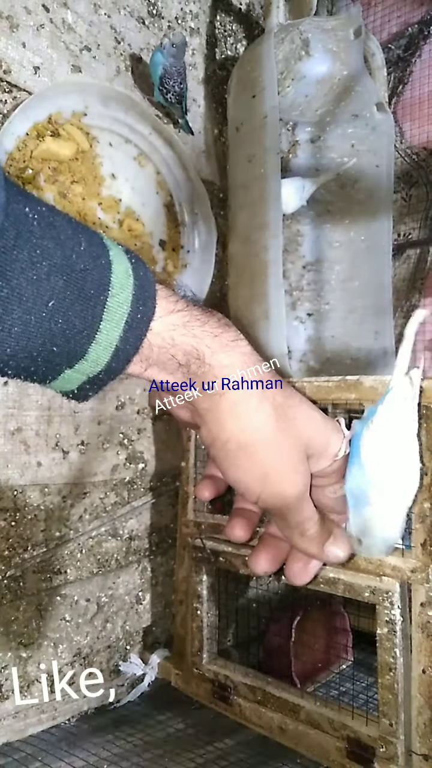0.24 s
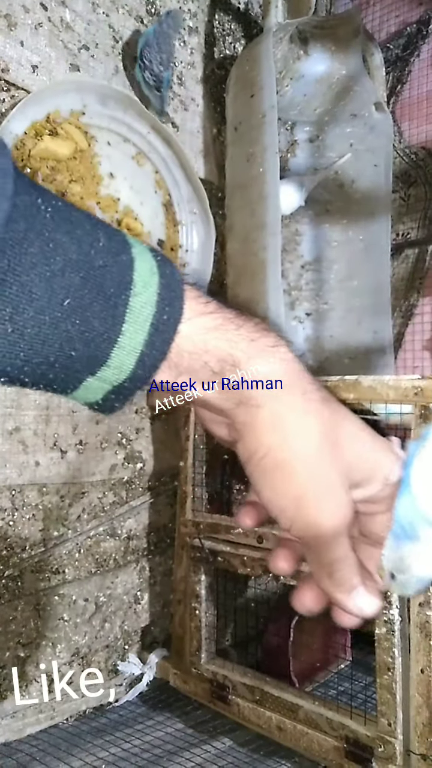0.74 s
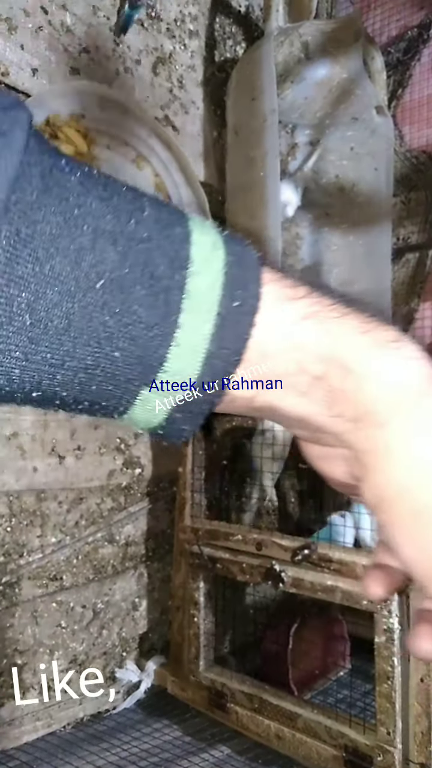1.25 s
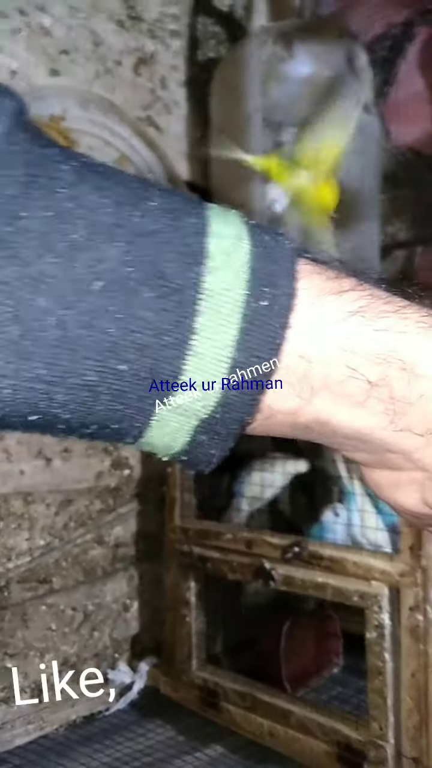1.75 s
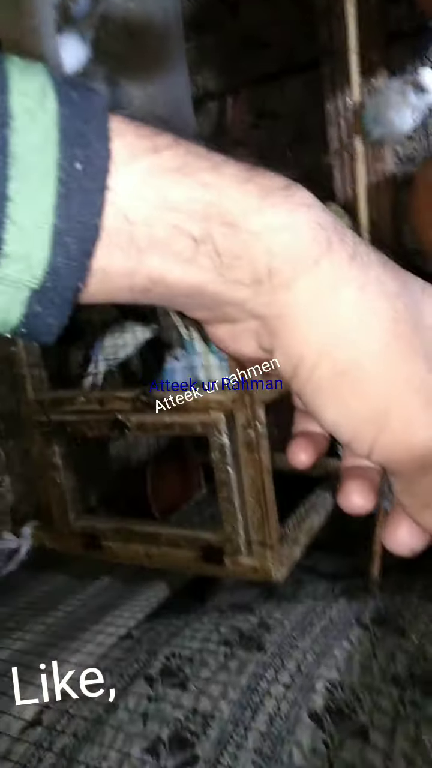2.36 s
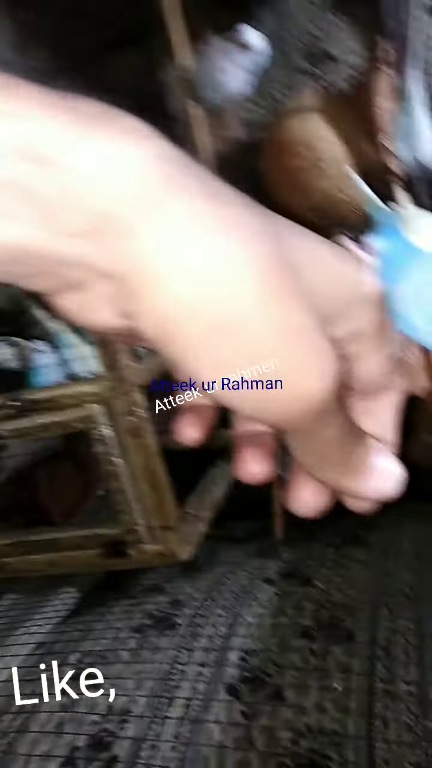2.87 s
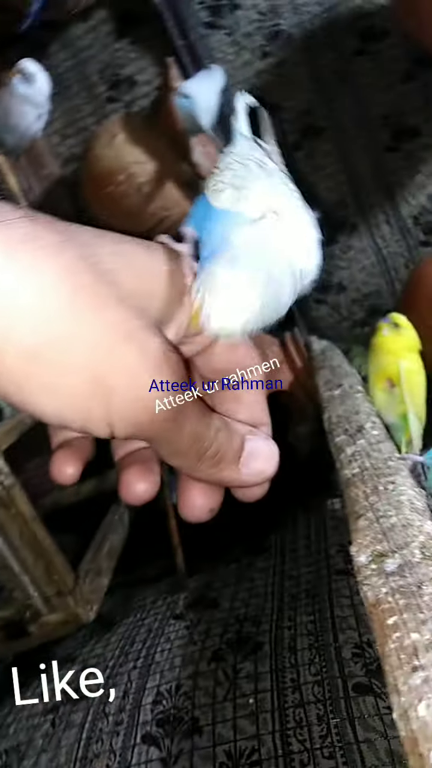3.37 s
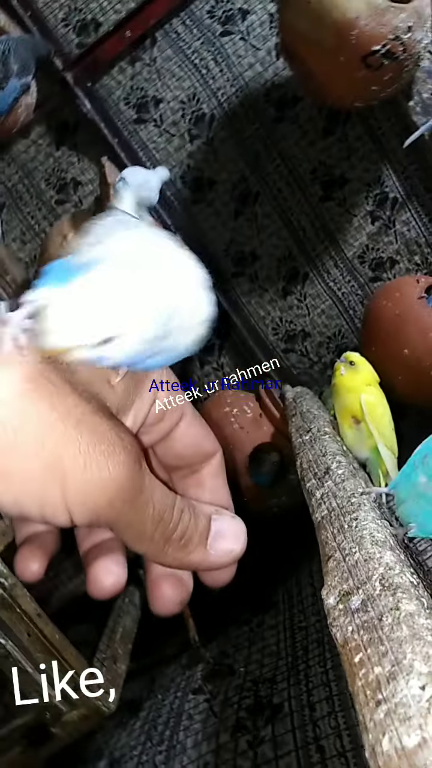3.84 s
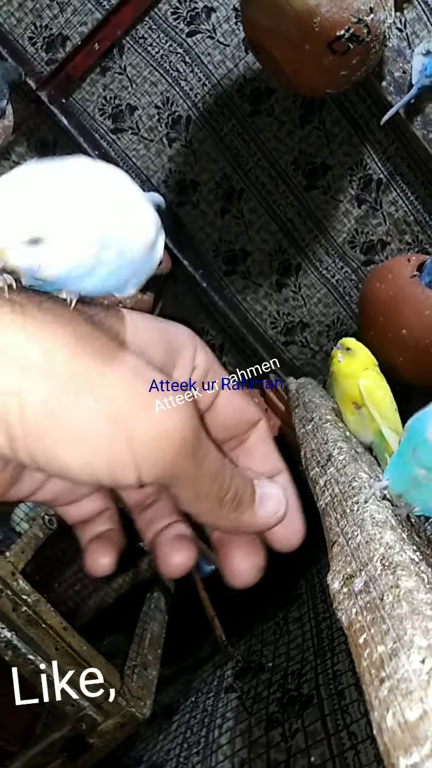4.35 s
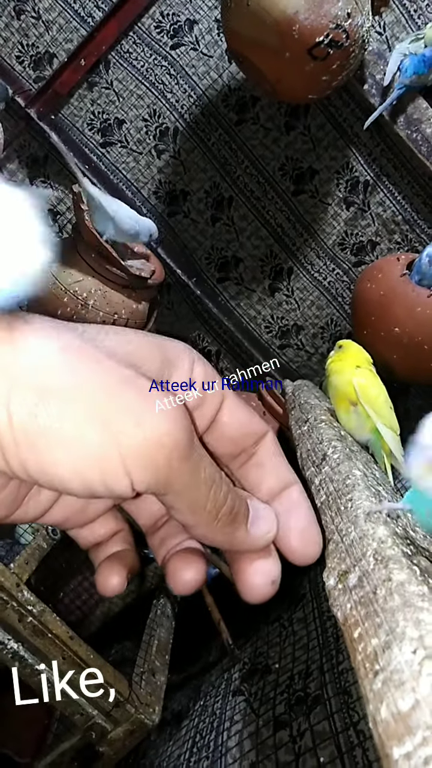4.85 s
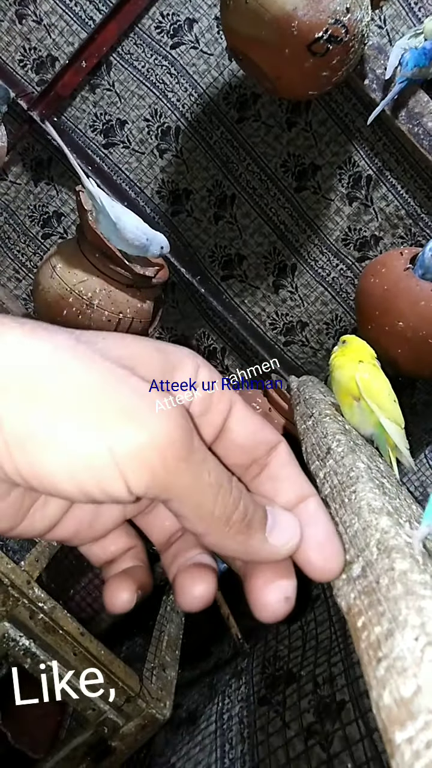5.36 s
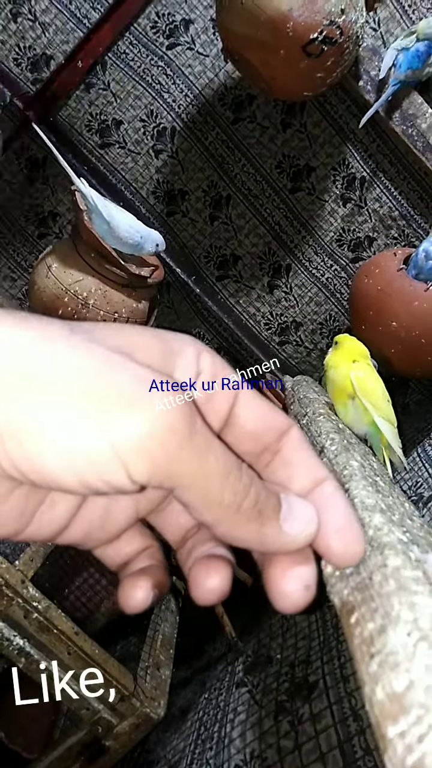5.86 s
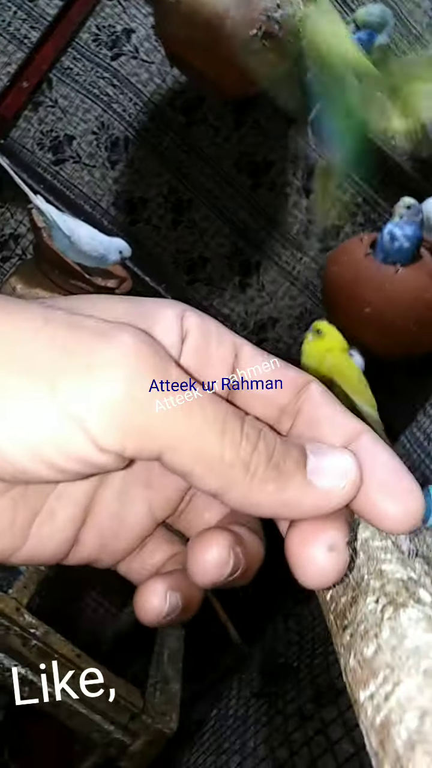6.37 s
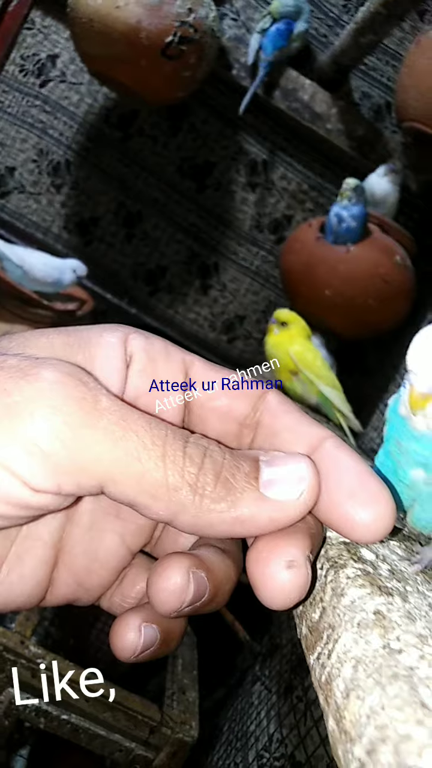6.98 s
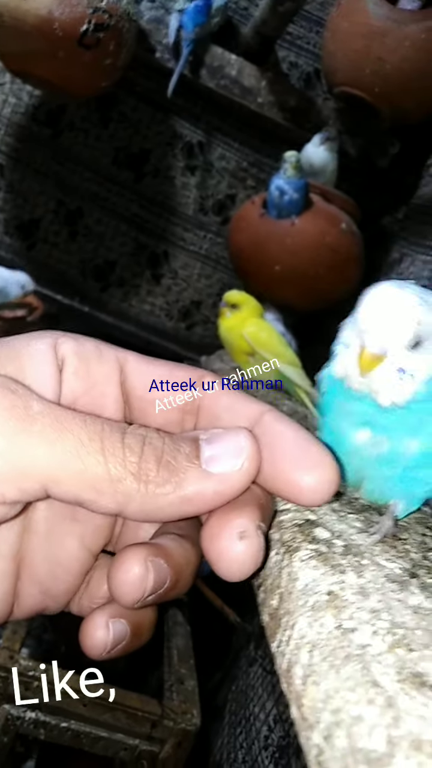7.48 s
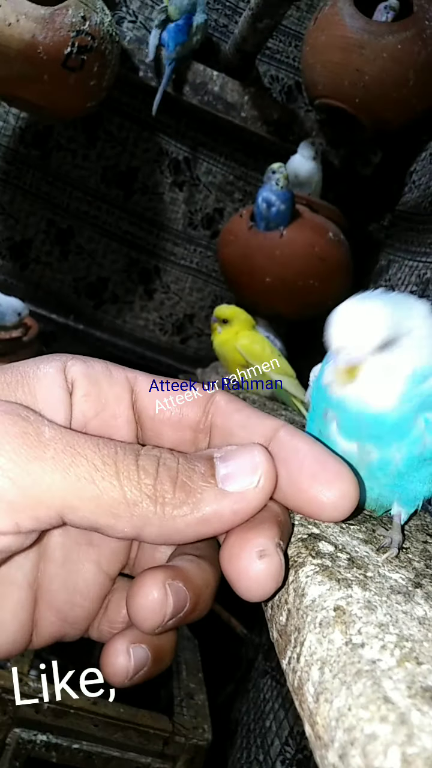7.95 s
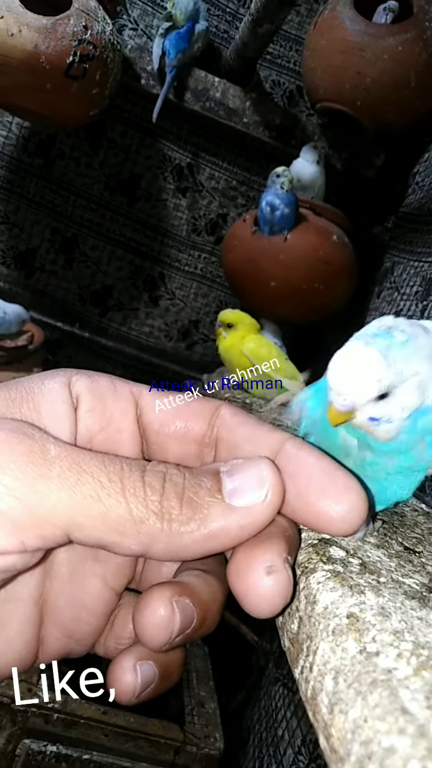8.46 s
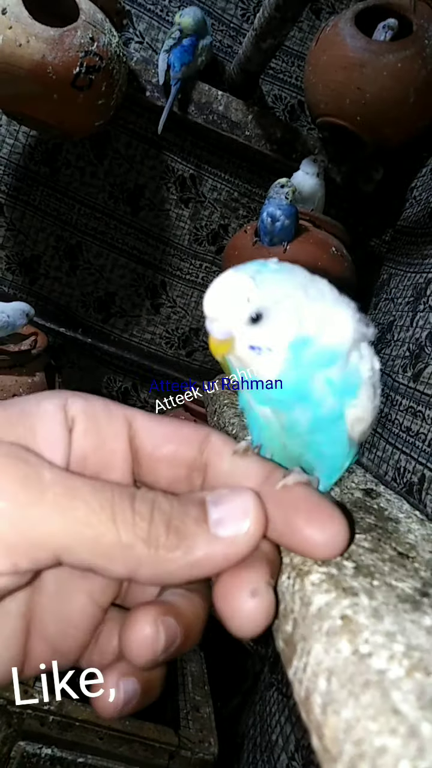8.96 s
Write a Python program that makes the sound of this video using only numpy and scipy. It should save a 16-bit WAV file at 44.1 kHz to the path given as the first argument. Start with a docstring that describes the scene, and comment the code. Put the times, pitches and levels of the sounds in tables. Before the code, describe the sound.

A flock of budgerigars chatters in a small enclosed aviary, captured close by a hand-held phone with weak echoes and a short tail. From 0 to 2.5 s, rapid rasping squawks, each a buzz of tiny puffs, mix with brief whistles over distant twitter; a claw tick snaps at the start. Around 2.6 s come harder squawks, a dull handling bump and a piercing high whistle, then a sharp double tick at 2.8 s. From 3.5 to 4.4 s, clear gliding whistles lead, strongest near 3.7 s. From 4.5 to 6.3 s it thins to sparse soft squawks, faint nasal warbles, low muttering and a tick at 5.6 s. Squawks return at 6.4 s, with bright whistles near 7 s. From 7.3 to 9 s, dense harsh scolding and very high chirps dominate, ending at 9.2 s on thin chirps. Low rumble and skin rubbing come and go underneath.

```python
"""A flock of budgerigars chatters in a small aviary: rasping squawks made of rapid puffs of air and a beak chirp,
whistles that are single gliding tones, and soft nasal warbles built from stacked harmonics.
Beaks and claws tick on perches as short ringing bursts of noise, and birds further off twitter as many
overlapping glides over a wash of noise. The hand-held phone adds shaped noise for rumble and rubbing, and one bump.
Weak echoes and a short tail give the sound of the aviary."""
import sys
import numpy as np
from scipy import signal
from scipy.fft import rfft, irfft, next_fast_len
from scipy.io import wavfile
from scipy.ndimage import uniform_filter1d, minimum_filter1d, map_coordinates

SR = 44100
rng = np.random.default_rng(int(sys.argv[2]) if len(sys.argv) > 2 else 0)


def waveform_to_disk(signal):
    """Save audio, clipped to [-1, 1], as 16-bit WAV at the path in sys.argv[1]."""
    frames = np.transpose(np.atleast_2d(signal))
    scaled = np.clip(frames, -1, 1) * 32767
    samples = np.round(scaled).astype(np.int16)
    wavfile.write(sys.argv[1], SR, samples)


N = 406602  # samples in the scene

# Rasping squawks. Each row: start in seconds, length in seconds, middle throat level in dB,
# beak level in dB, low throat level in dB.
SQUAWK_CALLS = [(0, 0.082, -25, -22.5, -45), (0.084, 0.054, -26, -23.5, -52),
                (0.223, 0.05, -21.5, -20.5, -37), (0.263, 0.11, -29.5, -31.5, -48),
                (0.42, 0.036, -34, -39, -35.5), (0.596, 0.047, -28, -34, -38),
                (0.857, 0.023, -30.5, -37, -55), (0.971, 0.058, -30, -39.5, -41.5),
                (1.118, 0.035, -33.5, -61, -35.5), (1.2, 0.035, -30.5, -27, -42.5),
                (1.247, 0.09, -30, -36.5, -45), (1.377, 0.11, -29.5, -34, -42.5),
                (1.602, 0.037, -31.5, -24, -37.5), (1.685, 0.055, -27, -32, -59),
                (1.728, 0.09, -23.5, -24, -45), (1.829, 0.029, -32, -24, -49),
                (1.878, 0.059, -27, -23.5, -44), (1.935, 0.048, -30, -28.5, -48),
                (2.017, 0.032, -35.5, -59, -47), (2.089, 0.03, -30, -31, -64),
                (2.238, 0.11, -24, -26.5, -58), (2.547, .054, -22, -17.5, -35),
                (2.682, 0.043, -21.5, -28, -47), (3.297, .024, -30, -29.5, -38),
                (3.612, 0.034, -27, -33, -26.5), (3.713, 0.03, -29.5, -38, -34),
                (4.131, 0.033, -35.5, -50, -42), (4.303, 0.058, -30.5, -38.5, -43.5),
                (4.58, .069, -32, -36.5, -41), (4.675, 0.026, -35, -38.5, -58),
                (4.889, 0.048, -43, -61, -38), (5.054, 0.09, -39.5, -47, -39.5),
                (5.268, 0.045, -37.5, -48, -45), (5.748, 0.15, -33, -39.5, -62),
                (6.101, 0.024, -35, -28.5, -40), (6.16, 0.066, -31, -37, -38), (6.379, 0.09, -25, -19, -50),
                (6.467, 0.083, -23.5, -25, -49), (6.529, 0.059, -38, -37, -47.5),
                (6.935, 0.084, -26.5, -28.5, -56), (7.362, 0.11, -20.5, -20, -60),
                (7.492, 0.083, -25.5, -20.5, -64), (7.605, 0.057, -24, -18, -41),
                (7.668, 0.08, -37, -31, -43), (7.731, 0.072, -21.5, -16.5, -39.5),
                (8.06, 0.078, -25, -15.5, -45), (8.205, 0.12, -27, -19, -53), (8.345, .11, -29, -21, -43),
                (8.501, 0.12, -27, -19, -68), (8.683, 0.11, -22.5, -14.5, -35), (8.848, .1, -20, -17, -32),
                (8.944, 0.072, -23, -18.5, -35)]
# Whistled notes. Each row: start in seconds, length in seconds, pitch halfway through in Hz,
# slide from start to end in octaves, level in dB.
WHISTLE_NOTES = [(0.14, 0.052, 2650, -0.61, -37), (0.712, .05, 3440, 0.012, -33.5),
                 (0.991, 0.084, 3490, -0.081, -33), (1.072, 0.043, 2250, .3, -41.5),
                 (1.688, 0.035, 3470, -0.16, -21.5), (2.127, 0.062, 3234, 0.15, -27.5),
                 (2.201, 0.015, 3600, -0.36, -29), (2.214, .045, 2670, .5, -30.5),
                 (2.476, 0.023, 3320, -.15, -29.5), (2.596, 0.044, 2680, -0.0027, -29.5),
                 (2.701, 0.039, 4616, 0.12, -10.5), (2.729, 0.041, 4450, -0.025, -29),
                 (2.793, 0.045, 2410, -1.15, -31.5), (2.877, 0.046, 2390, 0.39, -31),
                 (3.246, 0.059, 2515, 0.35, -32), (3.339, 0.075, 2770, 0.23, -39.5),
                 (3.473, 0.06, 3900, -0.025, -35.5), (3.473, 0.056, 5740, 0.0015, -45),
                 (3.57, 0.03, 2620, 0.0043, -23.5), (3.59, .031, 3810, -0.23, -22),
                 (3.632, .049, 2985, 0.2, -14.5), (3.677, .04, 2866, -.1, -11),
                 (3.711, .018, 2810, .03, -21), (3.746, .012, 3120, -.6, -17.5),
                 (3.939, .022, 2645, -0.082, -28.5), (3.954, .033, 2800, -.25, -29.5),
                 (4.008, 0.073, 2705, 0, -29.5), (4.035, 0.052, 3800, 0.45, -37.5),
                 (4.044, .07, 8300, .42, -43), (4.087, 0.044, 2680, -0.82, -34.5),
                 (4.24, .019, 3910, 0.41, -30.5), (4.256, 0.014, 2670, -0.33, -21),
                 (4.263, 0.039, 4420, -.55, -31), (4.274, 0.043, 3920, .1, -30),
                 (4.324, .03, 2777, -0.21, -26), (4.348, 0.043, 1297, -0.84, -46),
                 (4.385, 0.086, 2910, 0.073, -33), (5.286, 0.07, 2850, 0.3, -34),
                 (5.366, .054, 2410, 0.18, -35), (5.418, 0.0296, 2560, .1, -29.5),
                 (5.452, 0.052, 2410, -0.82, -37.5), (5.746, .028, 3450, 0.028, -28.5),
                 (5.749, 0.0678, 2610, 0.24, -30), (5.844, 0.0273, 3580, 0.017, -27),
                 (6.88, 0.018, 2860, -0.15, -14.5), (6.899, 0.017, 3900, 0.26, -22),
                 (6.916, 0.021, 3380, -.35, -18), (6.938, 0.02, 1900, 1.24, -25),
                 (6.963, 0.047, 2870, 0.0058, -13.5), (7.02, .012, 2965, 0.23, -10.5),
                 (7.028, .021, 2420, -1.86, -24), (7.155, 0.061, 2500, 0.72, -34),
                 (7.211, 0.017, 5100, 0.024, -30.5), (7.241, 0.047, 2433, -0.021, -27.5),
                 (7.267, .048, 5250, .38, -25), (7.309, .052, 2740, 0.028, -23.5),
                 (7.354, 0.0186, 5450, 0.24, -20), (7.53, 0.029, 5400, 0, -21),
                 (7.623, .032, 6350, -0.32, -14.5), (7.66, .025, 6130, -0.4, -23),
                 (7.689, 0.026, 4550, 0.55, -22.5), (7.71, .051, 6200, 0.025, -21.5),
                 (7.877, 0.034, 3090, -.4, -29), (7.923, 0.046, 3250, -1.18, -28),
                 (8.042, 0.018, 2410, -0.4, -36), (8.159, .014, 6900, 0.13, -21),
                 (8.177, .022, 6650, -.2, -23), (8.316, 0.0385, 2660, .22, -32),
                 (8.461, 0.034, 6260, .1, -27.5), (8.59, .024, 3900, -.14, -21),
                 (8.644, 0.072, 2820, -0.3, -28.5), (8.828, .029, 3550, -0.37, -17.5),
                 (8.879, 0.043, 2940, -.15, -21.5), (9.075, 0.045, 6450, -0.082, -20.5),
                 (9.128, .028, 6480, -0.21, -26), (9.183, 0.035, 6320, -0.048, -20.5)]
# Nasal warbles. Each row: start in seconds, length in seconds, pitch halfway through in Hz,
# slide from start to end in octaves, level in dB.
WARBLE_NOTES = [(1.536, 0.059, 603, -0.257, -35), (3.467, 0.092, 657, -.1, -44),
                (3.54, 0.05, 660, 0.17, -40), (4.75, 0.12, 537, -0.14, -50.5),
                (5.128, 0.086, 494, -.18, -44.5), (7.965, .068, 447, -0.23, -37.5)]
# Beak and claw ticks. Each row: time in seconds, peak level in dB, resonance in Hz.
PERCH_TICKS = [(0.088, -11.5, 5300), (0.405, -19.5, 4030), (0.7256, -18.5, 3400), (2.8258, -9, 4830),
               (2.8308, -10, 5700), (3.1285, -21, 3270), (3.4544, -24.5, 2610), (4.834, -31, 4260),
               (5.046, -26.5, 2670), (5.5581, -14.5, 3530), (6.0466, -22, 2460), (6.305, -30, 7980)]
# How strong the distant chatter is, before its two parts are balanced. Each row: time in seconds, level in dB.
CHATTER_LEVEL = [(0.0, -22.5), (0.13, -36), (0.36, -45), (1.03, -39), (1.21, -34.5), (2.11, -39.5),
                 (2.28, -54), (2.54, -36), (2.67, -39), (3.08, -41), (3.52, -41.5), (4.03, -40),
                 (4.19, -42.5), (5.11, -45), (5.24, -46), (6.83, -42.5), (7.04, -38), (7.5, -27.5),
                 (8.06, -33.5), (8.81, -29), (9.07, -34), (9.22, -36)]
# How strong the low muttering is, before its own trim. Each row: time in seconds, level in dB.
MUTTER_LEVEL = [(0.0, -54), (1.23, -49.5), (1.64, -46.5), (2.13, -51), (3.62, -44), (4.21, -56.5),
                (4.72, -40), (5.65, -53.5), (6.32, -43.5), (6.73, -54.5), (7.32, -48), (9.22, -57.5)]
# Tone colours of the throat, beak, nose and distant birds.
# Each row: frequency in Hz, relative level in dB.
LOW_THROAT_COLOUR = [(200, -74), (700, -8.5), (1150, -5.5), (1500, 6), (2000, 10.5), (2600, 3.5),
                     (5000, -58)]
MID_THROAT_COLOUR = [(1200, -68), (2100, -8), (2900, -0.5), (3600, 4.5), (4600, 0), (5600, -12),
                     (9000, -61)]
BEAK_COLOUR = [(3200, -35), (4700, -1.5), (5600, 1.5), (6400, -1), (7200, -3), (8200, -10), (9700, -15.5),
               (11000, -25), (14500, -28)]
NASAL_COLOUR = [(500, -29), (1000, -10), (1600, 4), (2200, -4), (3100, 2.5), (4100, -6.5), (5500, -17),
                (8000, -22), (12000, -41)]
FAR_COLOUR = [(300, -49), (550, -28), (800, -6.5), (1400, -6.5), (2700, 11.5), (4500, 2), (6500, 1),
              (9000, -3.5), (14500, -29.5)]
# Tone colours of the booming phone case and of skin rubbing on it.
# Each row: frequency in Hz, relative level in dB.
RUMBLE_COLOUR = [(30, -14), (50, -5), (60, -13), (71, 6.5), (82, -4), (105, -3.5), (125, 3.5), (140, -8),
                 (172, -15), (196, -0.5), (220, -20), (280, -14.5), (420, -52)]
RUBBING_COLOUR = [(120, -12), (200, -1), (300, -2), (500, -2), (800, -5.5), (1500, -17), (4000, -23)]
# How strong the case rumble is, then the rubbing. Each row: time in seconds, level in dB.
RUMBLE_LEVEL = [(0.0, -46), (0.25, -63), (0.36, -40), (0.95, -42.5), (1.1, -62), (1.28, -44.5),
                (1.98, -42.5), (2.15, -50), (2.39, -39.5), (3.62, -46.5), (4.24, -86), (4.41, -65),
                (5.52, -44.5), (6.52, -38), (7.8, -54.5), (7.83, -72), (9.12, -42), (9.22, -59)]
RUBBING_LEVEL = [(0.0, -49.5), (0.25, -62), (0.38, -44), (0.74, -50), (1.08, -67), (1.85, -47), (3.57, -51),
                 (4.96, -87.5), (5.6, -49), (5.88, -55.5), (6.57, -43), (6.8, -56.5), (6.91, -42.5),
                 (7.37, -56.5), (7.58, -46), (7.91, -71.5), (8.42, -57), (9.22, -49)]
# How long the aviary rings. Each row: frequency in Hz, time to fade by 60 dB in seconds.
AVIARY_FADE = [(200, 0.55), (2500, 0.24), (6000, 0.35), (14000, 0.064)]

# The harder a squawk rings at the beak, the deeper its pulses (levels in dB, depth 0 to 1).
HARD_DB, HARD_DEPTH, DEPTH_PER_DB, SOFT_DEPTH = -16.5, 0.89, 0.23, 0.39
SQUAWK_EDGE_S = 0.0049  # rise and fall of the hardest squawks, in seconds
SQUAWK_PEAK, WHISTLE_PEAK = 0.39, 0.5  # loudest moment, as a share of the note's length
# Level and rising notes start and end this many octaves under their straight slide.
ARCH_OCTAVES = 0.1182
# Falling notes arch less; steep ones bend the other way: they drop fast, then level off.
DIVE_BEND, DIVE_LIMIT_OCTAVES = 0.341, 0.093
# A whistle swells as it slides through this throat resonance: centre, width, boost.
THROAT_HZ, THROAT_OCTAVES, THROAT_DB = 3050, 0.49, 5.5
TOP_HZ = 14350  # nothing is kept from here up


def squawks(pulse_hz=180, jitter=0.14, beak_hz=6000, arch_hz=850, sag_db=22):
    """The syrinx opens in rapid puffs: each rasps in the throat and makes a tiny arched chirp at the beak."""
    breathy, ringing = np.zeros(N), np.zeros(N)
    for start, length, mid_db, beak_db, low_db in SQUAWK_CALLS:
        u = progress(length)
        n = len(u)
        depth = np.clip(HARD_DEPTH + DEPTH_PER_DB * (beak_db - HARD_DB), SOFT_DEPTH, 1)
        rate = pulse_hz * (1 + 0.041 * rng.standard_normal() + jitter * wobble(n, 161.6))
        opening = (1 - np.cos(phase_of(rate) + 1)) / 2
        puffs = np.exp(1.8 * depth * opening) * amp(1.9 * wobble(n, 170))
        # deeply pulsed calls start and stop abruptly, the others ease in and out
        edge = SQUAWK_EDGE_S + 0.23 * length * (1 - depth) ** 2
        drive = puffs * swell(u, SQUAWK_PEAK, edge, sag_db)

        # quiet calls are more voiced than the hard scolding
        voiced = np.clip(0.25 - (mid_db + 20) / 45, 0.2, 0.65)
        low = throat(drive, LOW_THROAT_COLOUR, centre_hz=1672, voiced=voiced)
        mid = throat(drive, MID_THROAT_COLOUR, centre_hz=2918, voiced=voiced)
        upper_mid = throat(drive, MID_THROAT_COLOUR, centre_hz=3980, voiced=voiced)
        mid = unit(mid + 1.6 * upper_mid)

        hiss = coloured(drive * rng.standard_normal(n), BEAK_COLOUR)
        chirp_hz = beak_hz + arch_hz * depth * (opening - 0.5)
        chirp_hz = chirp_hz + 190 * wobble(n, 892) + 210 * wobble(n, 60.44)
        chirp = unit(drive * np.sin(phase_of(chirp_hz)))
        # hard calls ring at the beak, soft ones stay breathy
        share = np.clip(0.56 + (beak_db + 15) / 40, 0.08, 0.7)
        add(ringing, start, amp(beak_db) * np.sqrt(share) * chirp)
        beak_air = amp(beak_db) * np.sqrt(1 - share) * hiss
        add(breathy, start, amp(low_db) * low + amp(mid_db) * mid + beak_air)
    return ringing + uneven(breathy, depth_db=3.3)


def throat(drive, spectrum, centre_hz, voiced, wander=0.09, scatter=0.024):
    """One throat resonance: rushing air mixed with an unsteady tone, at about rms 1."""
    n = len(drive)
    drift = wander * (wobble(n, 54.83) + rng.standard_normal())
    hz = centre_hz * np.exp(drift + scatter * wobble(n, 712))
    air = coloured(drive * rng.standard_normal(n), spectrum)
    tone = unit(drive * np.sin(phase_of(hz)))
    share = np.clip(voiced, 0, 1)
    return np.sqrt(share) * tone + np.sqrt(1 - share) * air


def uneven(x, depth_db, size=5):
    """Tongue and beak keep moving: patches of the spectrum, some hundred Hz wide, swell and fade."""
    z = signal.stft(x, nperseg=256)[2]
    across_hz = uniform_filter1d(rng.standard_normal(z.shape), size - 1, 0)
    field = uniform_filter1d(across_hz, size + 2, 1)  # now smooth over time too
    gain = amp(depth_db * unit(field))
    return signal.istft(z * unit(gain), nperseg=256)[1][:len(x)]


def whistles():
    """The gliding notes of the nearby birds: the louder a note, the purer."""
    out = np.zeros(N)
    for start, length, pitch, slide, db in WHISTLE_NOTES:
        rough = np.clip((-db - 11) / 22, 0.12, 0.9)
        add(out, start, amp(db) * whistle(progress(length), pitch, slide, rough))
    return out


def whistle(u, pitch, slide, rough, second_db=-25, third_db=-31, rasp_db=-14, breath_db=-13):
    """One gliding tone with weak overtones; roughness makes it tremble, rasp and hiss."""
    n = len(u)
    tune = arc(u, pitch, slide)
    hz = tune * (1 + 0.028 * rough * wobble(n, 380))
    flutter = amp((1 + 3 * rough) * wobble(n, 170))
    octaves_off = np.log2(tune / THROAT_HZ)
    resonance = amp(THROAT_DB / (1 + (octaves_off / THROAT_OCTAVES) ** 2))
    phase = phase_of(hz)
    tone = np.sin(phase) * (1 + rough * amp(rasp_db) * wobble(n, 2200))
    for k, db in ((2, second_db), (3, third_db)):
        flicker_db = 4 * wobble(n, 110)
        level = amp(db + 2.3 * (rough - 0.4) + flicker_db)
        # overtones fade out above about 10500 Hz
        tone = tone + level * np.sin(k * phase) / (1 + (k * hz / 10500) ** 10)
    tone += rough * amp(breath_db) * coloured(rng.standard_normal(n), FAR_COLOUR)
    spindle = swell(u, WHISTLE_PEAK, edge=0.0018, sag_db=24)
    return unit(tone * flutter * resonance * spindle)


def arc(u, pitch, slide):
    """The pitch of a note: an arched slide, or a steep dive that levels off."""
    arch = max(ARCH_OCTAVES + DIVE_BEND * min(slide, 0), -DIVE_LIMIT_OCTAVES)
    return pitch * 2 ** (slide * (u - 0.5) - arch * (2 * u - 1) ** 2)


def warbles():
    """Soft nasal notes, each placed at its time and level."""
    out = np.zeros(N)
    for start, length, pitch, slide, db in WARBLE_NOTES:
        add(out, start, amp(db) * warble(progress(length), pitch, slide))
    return out


def warble(u, pitch, slide, count=16):
    """A nasal note: a stack of harmonics shaped by the throat, each swelling on its own."""
    hz = arc(u, pitch, slide) * (1 + 0.009 * wobble(len(u), 250))
    k = np.arange(1, count + 1)[:, None]
    drift_db = 3.5 * np.array([wobble(len(u), 50) for _ in range(count)])
    levels = amp(along(NASAL_COLOUR, k * hz) + drift_db)
    start_phases = rng.uniform(0, 2 * np.pi, (count, 1))
    partials = levels * np.sin(k * phase_of(hz) + start_phases)
    return unit(partials.sum(axis=0) * swell(u, 0.17, edge=0.01, sag_db=19))


def ticks(t60=0.016):
    """Beaks and claws on perches: short dry bursts of noise, each ringing at one resonance."""
    out, t = np.zeros(N), np.arange(SR // 20) / SR
    for s, db, hz in PERCH_TICKS:
        burst = rng.standard_normal(len(t)) * amp(-60 * t / t60)
        snap = filtered(burst, lambda f: 1j * f * hz * 0.6 / (hz * hz - f * f + 1j * f * hz * 0.074))
        add(out, s, amp(db) * snap / np.abs(snap).max())
    return out


def flock(chirp_db=-5, wash_db=-4.0, mutter_db=-2, lowest_hz=700):
    """Birds further off: twitter over a rasping wash, and low muttering; small throats make no bass."""
    wash = uneven(coloured(rng.standard_normal(N), FAR_COLOUR), depth_db=7.0)
    wash = wash * amp(4.2 * wobble(N, 40))  # restless loudness
    high = amp(chirp_db) * twitter(centre_hz=3187, octaves=1.1, count=360) + amp(wash_db) * wash
    low = amp(mutter_db) * twitter(centre_hz=1512, octaves=0.93, count=330)
    chatter = amp(curves(CHATTER_LEVEL)[0]) * high + amp(curves(MUTTER_LEVEL)[0]) * low
    return filtered(chatter, lambda hz: 1 / np.sqrt(1 + (lowest_hz / (hz + 1)) ** 10))


def twitter(centre_hz, octaves, count, mean_slide=-0.1426, slide_range=0.695):
    """An unbroken run of short overlapping glides around one pitch, at rms 1."""
    out = np.zeros(N)
    for i, (when, length, pitch, slide, size) in enumerate(rng.random((count, 5))):
        u = progress(0.0221 + 0.045 * length)
        hz = centre_hz * 2 ** (octaves * (pitch - 0.5))
        note = whistle(u, hz, mean_slide + slide_range * (slide - 0.5), rough=0.93)
        add(out, (i + when) / count * N / SR, amp(3.4 * size) * note)
    return unit(out)


def handling(bump_s=2.612, bump_db=-19, bump_hz=70, bump_t60=0.039, split_hz=160, upper_db=7):
    """Fingers shift on the phone: the case rumbles, skin rubs, and one bump thuds."""
    rumble_db, rub_db = curves(RUMBLE_LEVEL) + curves(RUBBING_LEVEL)
    boom = coloured(rng.standard_normal(N), RUMBLE_COLOUR)
    deep = filtered(boom, lambda hz: 1 / (1 + (hz / split_hz) ** 16))
    # the upper resonance of the case follows the rubbing of the skin
    out = amp(rumble_db) * deep + amp(rub_db + upper_db) * (boom - deep)
    rubbing = coloured(rng.standard_normal(N), RUBBING_COLOUR)
    out += amp(rub_db + 4.0 * wobble(N, 40)) * rubbing
    t = np.arange(SR // 4) / SR
    knock = coloured(rng.standard_normal(len(t)), RUBBING_COLOUR) * amp(-60 * t / 0.019)
    thud = np.sin(2 * np.pi * bump_hz * t) * amp(-60 * t / bump_t60)
    add(out, bump_s, amp(bump_db) * (0.83 * knock - thud))
    return out


def aviary(x, early_db=-14, tail_db=-13, count=8):
    """Nearby floor and walls throw back weak copies, along with a short diffuse tail."""
    hz, t, z = signal.stft(rng.standard_normal(SR // 2), SR, nperseg=256)
    fade = amp(-60 * t / along(AVIARY_FADE, hz)[:, None])
    tail = signal.istft(z * fade, SR, nperseg=256)[1]
    echo = amp(tail_db) * tail / np.linalg.norm(tail)
    delays = (rng.uniform(0.002, 0.02, count) * SR).astype(int)
    echo[delays] += amp(early_db) * rng.choice([-1, 1], count) / np.sqrt(count)
    return signal.fftconvolve(x, echo)[:N]


def ports(x, lag_samples):
    """Sound reaches the right microphone port a moment before the left."""
    sides = np.array([[-1], [1]])  # left is delayed, right is advanced, by half the lag each
    return filtered(x, lambda hz: np.exp(1j * np.pi * hz / SR * lag_samples * sides))


def amp(db):
    """Decibels to gain."""
    return 10 ** (np.asarray(db) / 20)


def unit(x):
    """Scale to rms 1, a standard average strength."""
    return x / np.sqrt(np.mean(x ** 2) + 1e-20)


def along(points, hz):
    """Read (Hz, value) points on a log axis."""
    f, v = np.transpose(points)
    return np.interp(np.log(np.abs(hz) + 1), np.log(f + 1), v)


def curves(rows):
    """One value per sample for each column after the time."""
    s, *cols = np.transpose(rows)
    return [np.interp(np.arange(N) / SR, s, c) for c in cols]


def wobble(n, rate):
    """A smooth random curve of n samples, with rate random points a second."""
    knots = rng.standard_normal(int(n * rate / SR) + 4)
    return map_coordinates(knots, [np.arange(n) * rate / SR], mode="mirror")


def filtered(x, response):
    """Multiply the spectrum of x by a response of frequency."""
    n = x.shape[-1]
    m = next_fast_len(n + 2048)  # spare room for the filter to ring out
    return irfft(rfft(x, m) * response(np.fft.rfftfreq(m, 1 / SR)), m)[..., :n]


def coloured(x, spectrum):
    """Give x a tone colour, at rms 1."""
    return unit(filtered(x, lambda hz: amp(along(spectrum, hz))))


def add(track, s, sound):
    """Mix a sound into a track at time s in seconds."""
    i = int(np.clip(round(s * SR), 0, N))
    track[i:i + len(sound)] += sound[:N - i]


def progress(length):
    """0 to 1 over the samples of a note, which lasts at least 5 ms."""
    return np.linspace(0, 1, max(int(length * SR), SR // 200))


def swell(u, peak, edge, sag_db):
    """Air pressure over a note: smooth edges in seconds, sagging away from its loudest moment."""
    ends = np.clip(np.minimum(u, 1 - u) * len(u) / SR / edge, 0, 1)
    return unit(np.sin(ends * np.pi / 2) ** 2 * amp(-sag_db * (u - peak) ** 2))


def phase_of(hz):
    """Running phase of a moving frequency, in radians."""
    return 2 * np.pi * np.cumsum(hz) / SR


def scene():
    """All birds in the aviary and the handled phone, heard at two closely spaced ports."""
    birds = squawks() + whistles() + warbles() + ticks() + flock()
    centre = birds + aviary(birds) + handling()
    # extra echoes, opposite at the two ports, widen mainly the treble: (Hz, dB)
    width = [(500, -69), (3000, -9.0), (7000, -2.0), (12000, 7)]
    echoes = aviary(birds, early_db=-9.0, tail_db=-19.5)
    spread = filtered(echoes, lambda hz: amp(along(width, hz)))
    return ports(centre, lag_samples=0.76) + np.array([spread, -spread])


def record(dry, low_cut_hz=44):
    """A fast limiter holds the loudest moments; the phone drops the deepest bass and the highest treble."""
    needed = np.minimum(1, 0.78 / (np.abs(dry).max(axis=0) + 1e-9))
    gain = uniform_filter1d(minimum_filter1d(needed, size=45), size=31)
    return filtered(dry * gain, lambda hz: (hz < TOP_HZ) / (1 + (low_cut_hz / (hz + 1)) ** 8))


dry = scene()
out = record(dry)
waveform_to_disk(out)
```